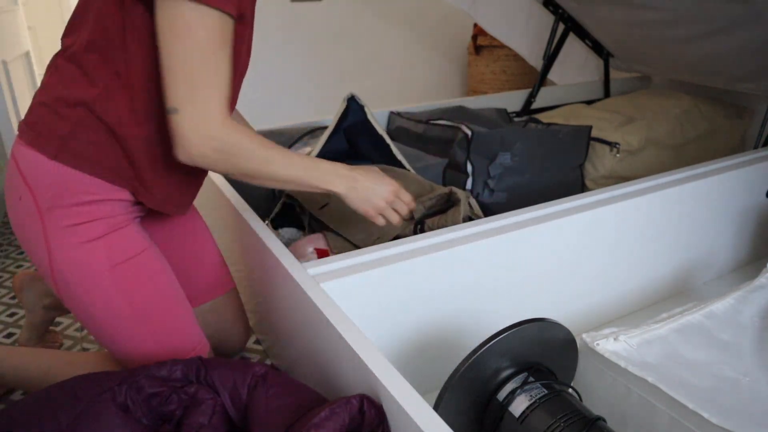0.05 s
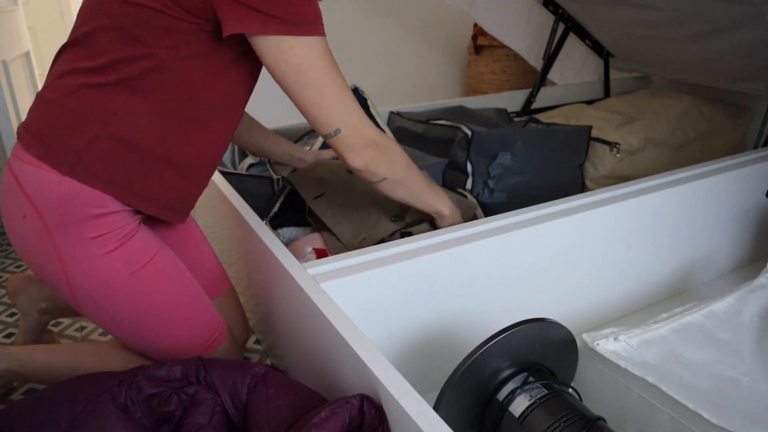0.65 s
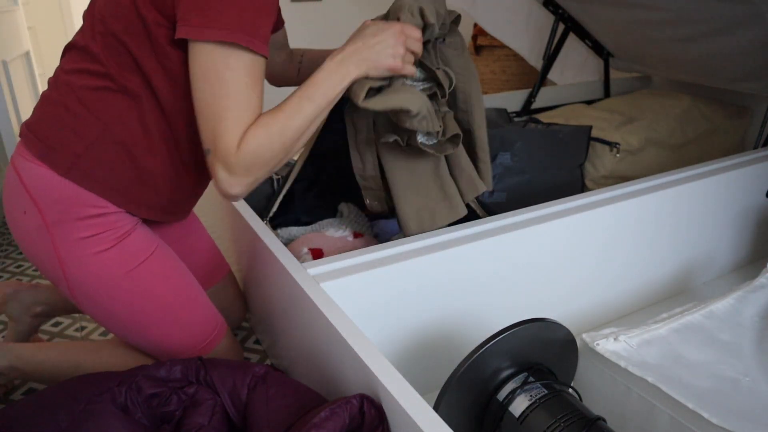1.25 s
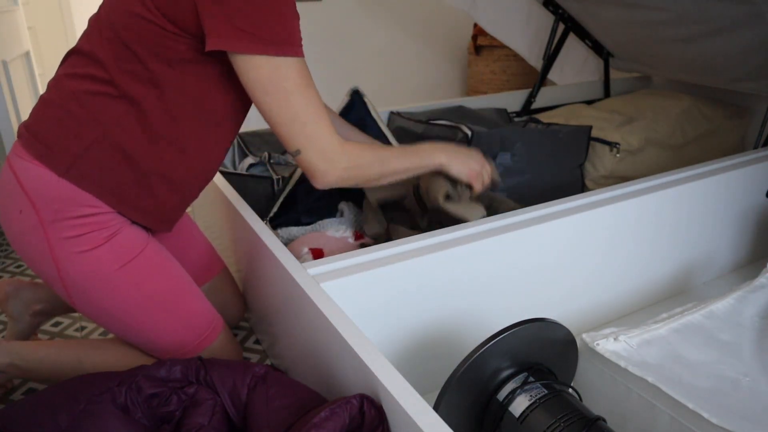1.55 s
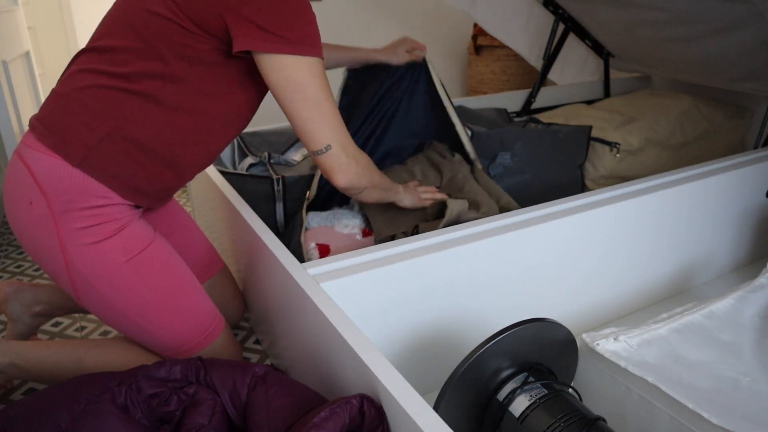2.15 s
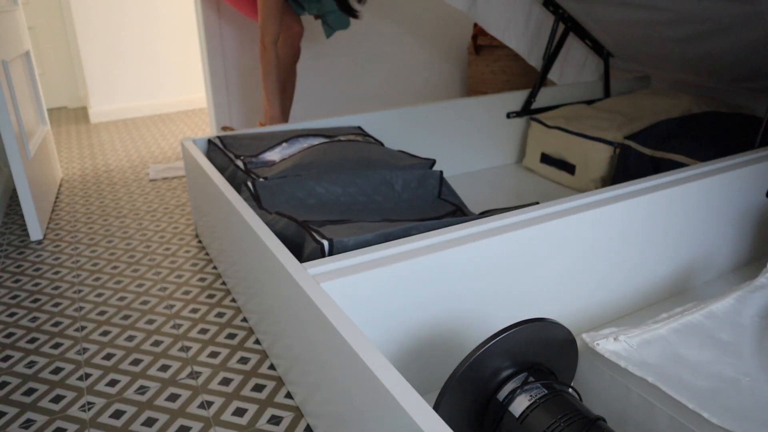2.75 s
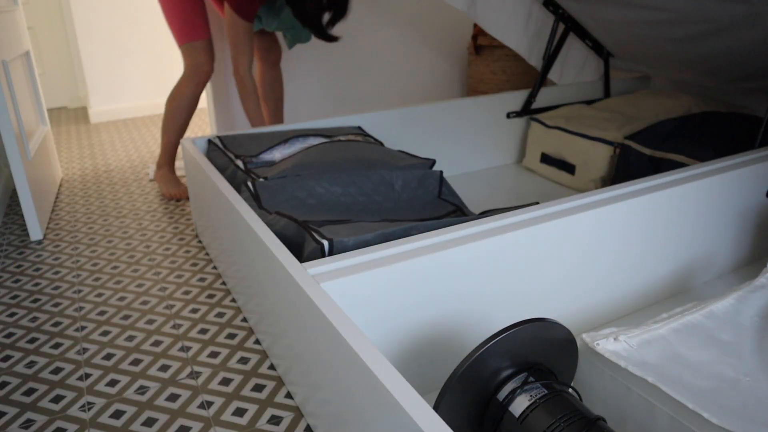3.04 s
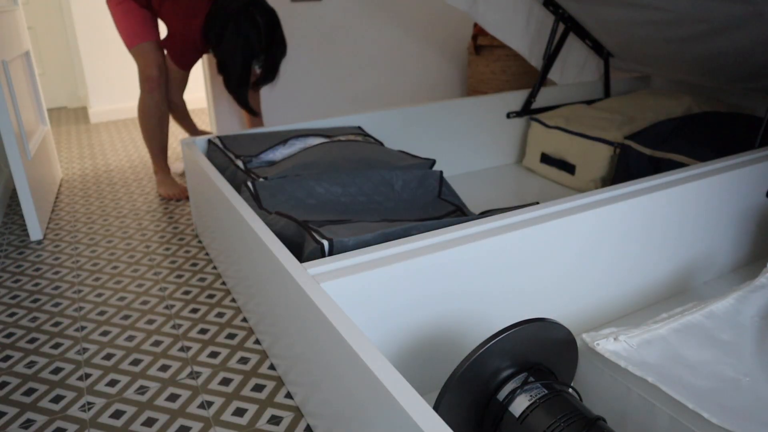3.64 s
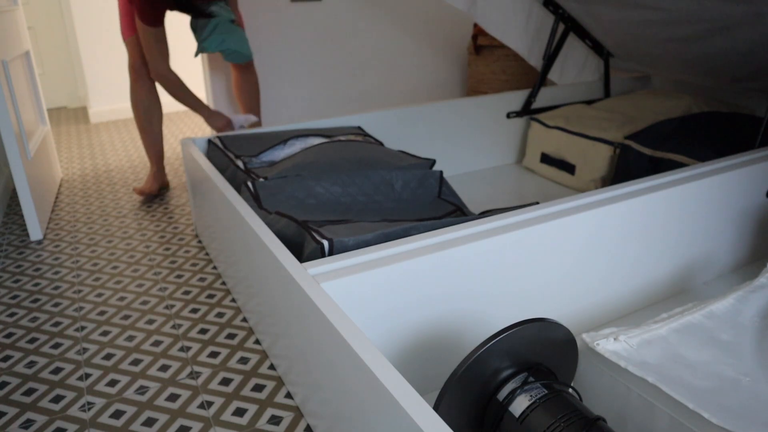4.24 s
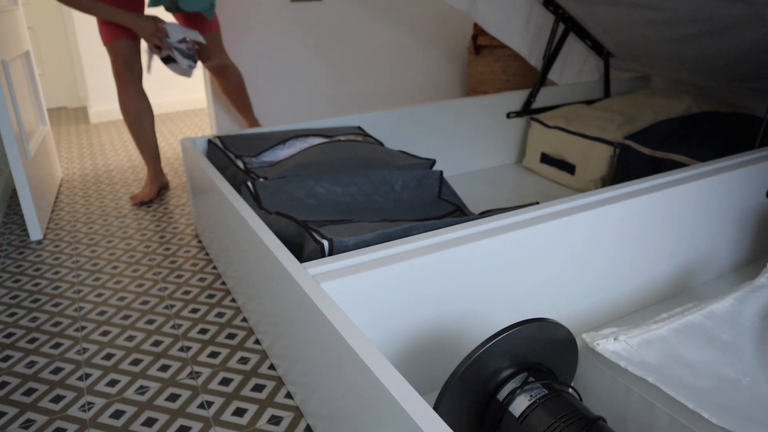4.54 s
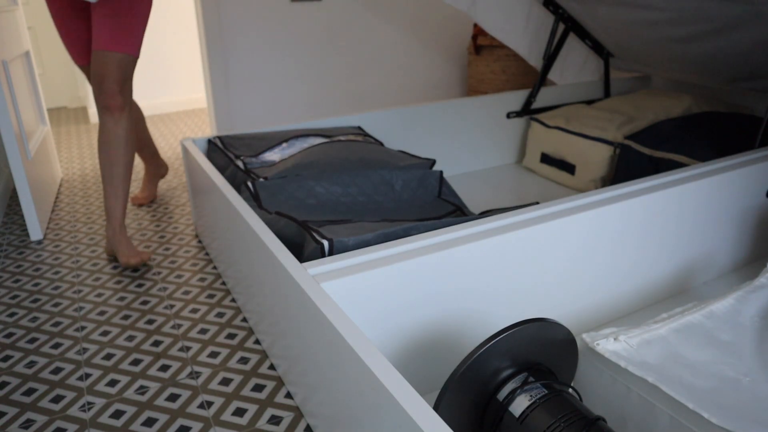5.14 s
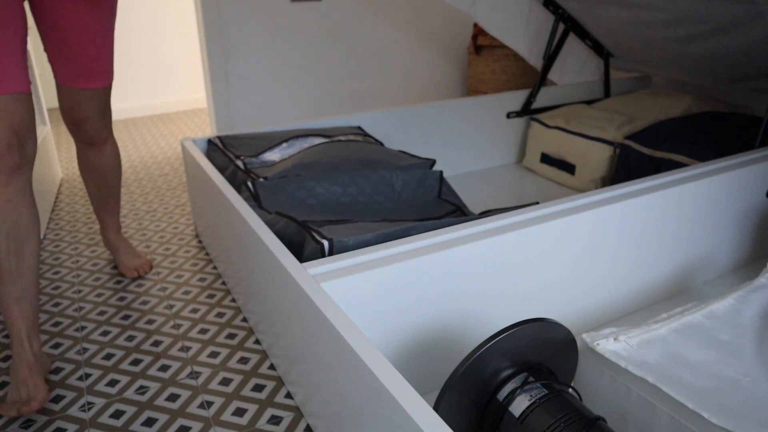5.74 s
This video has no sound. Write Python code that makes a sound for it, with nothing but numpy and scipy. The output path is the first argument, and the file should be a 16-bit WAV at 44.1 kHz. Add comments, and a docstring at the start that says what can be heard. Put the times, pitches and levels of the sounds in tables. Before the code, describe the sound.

In a quiet, slightly echoing bedroom, someone stuffs clothes into a zipped bag near a stereo microphone: soft rustles, then a louder flurry with buttons and fittings ticking and clacking on wood. From farther away come two spells of boxy scraping and hollow knocks as fabric is pushed along a wooden storage base. Bare feet then thud dully on the tiles with a faint brushing.

```python
"""Packing clothes into a bed base

Close by, clothes are pushed into a zipped fabric bag in a bed's wooden storage base: cloth rubs and
crinkles, buttons and zip pulls tick. Then, from across the tiled bedroom, things are shoved and wiped
along the far side of the base, which knocks and rings. Bare feet thud on the floor.
A small stereo microphone spreads the treble very wide."""
import sys
import numpy as np
from scipy import signal
from scipy.fft import rfft, irfft, next_fast_len
from scipy.io import wavfile

SR = 44100
rng = np.random.default_rng(int(sys.argv[2]) if len(sys.argv) > 2 else 0)


def pcm_store(signal):
    """Save signal as 16-bit PCM."""
    levels = np.round(np.clip(np.atleast_2d(signal), -1, 1) * 32767)
    wavfile.write(sys.argv[1], SR, levels.astype(np.int16).T)


N = 259744
T = np.arange(N) / SR
CUTOFF_HZ = 12700


def amp(db):
    """Decibels to gain."""
    return 10 ** (np.asarray(db) / 20)


def rms_one(x):
    """Scale to an rms of 1."""
    return x / np.sqrt(np.mean(x ** 2) + 1e-20)


def dying(t, t60):
    """Exponential decay, 60 dB down after t60 seconds."""
    return np.exp(-np.log(1000) * t / max(t60, 1e-3))


def colour(x, spectrum):
    """EQ by a curve of (frequency [Hz], gain [dB]) points."""
    hz, db = np.transpose(spectrum)
    size = next_fast_len(x.shape[-1] + 4096)
    bins = np.maximum(np.fft.rfftfreq(size, 1 / SR), 1)
    gain = amp(np.interp(np.log(bins), np.log(hz), db))
    return irfft(rfft(x, size) * gain, size)[..., :x.shape[-1]]


def resonate(x, hz, width_hz):
    """One resonance, unity gain at its peak."""
    r = np.exp(-np.pi * width_hz / SR)
    feedback = [1, -2 * r * np.cos(2 * np.pi * hz / SR), r * r]
    return signal.lfilter(np.array([1, 0, -1]) * (1 - r * r) / 2, feedback, x)


def drift(per_s):
    """A random wander with an rms of 1."""
    knots = rng.standard_normal(2048)
    return rms_one(np.interp(T * per_s, np.arange(len(knots)), knots))


def add(out, s, sound):
    """Mix a sound in at s seconds."""
    start = max(round(s * SR), 0)
    out[..., start:start + sound.shape[-1]] += sound[..., :N - start]


def bedroom(x, wet_db, t60=0.48):
    """Dense reflections off tiles and walls follow the direct sound; the treble dies first."""
    t = T[:SR // 2]
    echoes = rng.standard_normal((2, len(t))) * np.clip(t / 0.0013 - .3, 0, 1)
    dull = signal.sosfilt(signal.butter(2, 4500, fs=SR, output="sos"), echoes)
    bright_early = 1.53 * np.roll(echoes, 1, axis=0) * dying(t, 0.053)
    tail = dull * dying(t, t60) + bright_early
    tail /= np.sqrt(np.sum((echoes * dying(t, t60)) ** 2) / 2)
    wet = signal.fftconvolve(x, tail, axes=1)[:, :N]
    return (x + amp(wet_db) * wet) / np.hypot(1, amp(wet_db))


def spread(pair, width, lead):
    """Mid/side to left/right; sound from the left arrives there first, a quarter turn ahead in the side."""
    mid, side = pair
    ahead = -signal.hilbert(mid, next_fast_len(N)).imag[:N]
    side = colour(lead * ahead + np.sqrt(1 - lead ** 2) * side, width)
    return np.array([mid + side, mid - side])


def crinkles(per_s, spread_db, pitches=12):
    """Tiny folds buckle at random, each ringing a cycle or two at its own pitch; rows are mid and side."""
    sizes = amp(spread_db * np.minimum(rng.exponential(1, N), 4))
    buckles = sizes * (rng.random(N) < per_s / SR)
    pitch_index, out = rng.integers(0, pitches, N), 0
    for k, hz in enumerate(np.geomspace(500, 11000, pitches)):
        clicks = buckles * (pitch_index == k) * rng.choice([-1, 1], (2, N))
        out = out + resonate(clicks + 1e-18, hz, 0.54 * hz)
    return rms_one(out)


def stroke(s, swell_s, fade_s):
    """Cloth speeds up from rest, its sound growing as speed squared, then loses 31 dB per fade time."""
    speed = np.clip(1 + (T - s) / max(swell_s, .005), 0, 1)
    return speed ** 2 * amp(-31 * np.clip((T - s) / fade_s, 0, 10))


def rustle(strokes, weave, flutter_db):
    """Each stroke drives bulk, weave and fibres; the cloth catches and slips, so all three flutter."""
    # bands of shifting bulk, weave on weave and single fibres: (low edge [Hz], high edge [Hz])
    cloth_bands = [(65, 900), (900, 5000), (5000, 15000)]
    power = sum((amp([[db + bulk_db], [db], [db + fibre_db]]) * stroke(s, swell_s, fade_s)) ** 2
                for s, db, swell_s, fade_s, bulk_db, fibre_db in strokes)
    shared_slip, out = drift(per_s=110), 0
    for edges, push in zip(cloth_bands, np.sqrt(power)):
        band = rms_one(signal.sosfilt(signal.butter(4, edges, "band", fs=SR, output="sos"), weave))
        flutter = rms_one(amp(flutter_db * (shared_slip + 2.7 * drift(per_s=60))))
        out = out + band * push * flutter
    return out


def packing():
    """Hands push clothes into the bag, close up: friction hiss full of crinkles."""
    # hand strokes: (peak time [s], rub [dB], swell [s], fade [s], bulk re rub [dB], fibres re rub [dB])
    hand_strokes = [(0.04, -36, 0.68, 0.16, -3, -9), (0.17, -48.5, 0.027, 0.41, -3, -5.5),
                    (0.39, -47.5, 0.18, 0.42, 3.5, -3.5), (0.87, -56, 1.3, 0.68, 4.5, -9),
                    (1.01, -60.5, 0.23, 0.31, 13, 8), (1.33, -55.5, 0.13, 0.059, 9.5, -10),
                    (1.478, -52.5, 0.044, 0.1, 16, -22), (1.505, -58, 0.035, 0.25, 19.5, -1.5),
                    (1.605, -44.5, 0.048, 0.15, 7.5, -6.5), (1.67, -36.5, 0.067, 0.16, -1.5, -9),
                    (1.71, -42, 0.04, 0.1, 9, -22), (1.785, -36, 0.075, 0.23, -11, -1.5),
                    (1.855, -39, 0.072, 0.045, 6, -2.5), (1.982, -43.5, 0.022, 0.12, 12.5, -8),
                    (2.045, -32, 0.059, 0.061, 4.5, -8), (2.1, -29.5, 0.079, 0.24, -14, 1),
                    (2.14, -24.5, 0.087, 0.26, 0, -2.5), (2.21, -27.5, 0.17, 0.34, 4, -15),
                    (2.335, -41.5, 0.074, 0.17, 0, -2), (2.46, -41, 0.2, 0.19, 2.5, -3),
                    (2.6, -51.5, 0.19, 0.2, 5, -1)]
    # tone of close cloth: (frequency [Hz], gain [dB])
    cloth_tone = [(35, -22), (60, 4), (100, 4), (151, 7), (251, -1.5), (317, -7), (399, 2), (480, -2.5),
                  (560, -1.5), (680, -5.5), (830, -6.5), (1200, -8.5), (1710, -6.5), (1960, -8), (2150, -8),
                  (8820, -20), (11400, -17), (15000, -29)]
    folds = crinkles(per_s=900, spread_db=2.5)
    weave = colour(rng.standard_normal((2, N)) + amp(-9.5) * folds, cloth_tone)
    return bedroom(rustle(hand_strokes, weave, flutter_db=1.0), wet_db=-7.5)


def air_and_brushing():
    """Steady room air and, late on, the faint, slightly singing brush of soles and clothes."""
    # tone of both air and brushing: (frequency [Hz], gain [dB])
    hush_tone = [(15, -39), (25, 3), (54, 1.5), (150, -5.5), (278, -3), (309, -5.5), (604, -7.5),
                 (811, -10), (879, -11), (2020, -13.5), (2370, -15), (11800, -29.5), (15000, -24.5)]
    # brushes while walking: (peak time [s], rub [dB], swell [s], fade [s])
    brushes = [(4.6, -56, 0.59, 1.5), (4.85, -54.5, 0.93, 3), (5.18, -49, 0.24, 1.5),
               (5.528, -54, 0.24, 0.26), (5.76, -55.5, 0.09, 0.14), (5.88, -53.5, 0.067, 0.18)]
    bulk_db, fibre_db, sole_hz = 0.5, -6.5, 2030
    air = amp(-54) * rms_one(colour(rng.standard_normal((2, N)), hush_tone))
    friction = colour(rng.standard_normal((2, N)), hush_tone)
    singing_sole = amp(1.5) * resonate(friction, sole_hz, width_hz=120)
    strides = [(*row, bulk_db, fibre_db) for row in brushes]
    return air + amp(-4.5) * rustle(strides, friction + singing_sole, flutter_db=0.72)


def snaps(contacts, width, ring_db, rise_share):
    """Each contact swells for a share of its t60 and dies: pitched crackle, faint ring, bright edge."""
    out, t = np.zeros((2, N)), T[:SR // 3]
    for s, db, hz, t60, treble_db in contacts:
        hz = min(hz, CUTOFF_HZ)
        grit = rng.standard_normal((2, len(t)))
        ring = amp(ring_db) * np.sin(2 * np.pi * hz * t * [[1], [.9]])
        body = rms_one(resonate(resonate(grit, hz, width * hz), hz, width * hz))
        edge = amp(treble_db) * rms_one(resonate(grit, 4400, width_hz=10300))
        envelope = (1 - np.exp(-t / (rise_share * t60))) * dying(t, t60)
        add(out, s, amp(db) / 2 * (body + ring + edge) * envelope / envelope.max())
    return out


def cracks(contacts, cycles=6.2, edge_hz=6400):
    """The instant a button hits or a fold snaps over: a few hard cycles under a sharp edge."""
    out, t = np.zeros((2, N)), T[:SR // 20]
    for s, db, hz, _, treble_db in contacts:
        pop = np.sin(2 * np.pi * hz * t) * dying(t, cycles / hz)
        edge = amp(treble_db) * np.sin(2 * np.pi * edge_hz * t) * dying(t, 0.00077)
        mid_side = np.array([[1], [rng.choice([-.8, .8])]])
        add(out, s, amp(db) * (pop + edge) * mid_side)
    return out


def ticks():
    """Buttons, zip pulls and snapping folds tick close by; a few fittings clack on the wood."""
    # small contacts: (time [s], level [dB], pitch [Hz], t60 [s], treble [dB])
    contacts = [(0.009, -25.5, 4430, 0.018, 13), (0.1895, -22.5, 4700, 0.017, -14),
                (0.3333, -22.5, 4900, 0.0028, 1), (0.3357, -20.5, 4860, 0.0023, 6),
                (0.359, -28, 3500, 0.012, -1), (0.4515, -33, 3200, 0.024, -2),
                (1.3035, -32.5, 1680, 0.017, -16), (1.461, -35, 1500, 0.073, -17),
                (1.5096, -35, 11100, 0.018, -14), (1.605, -30, 950, 0.022, -18),
                (1.6637, -28, 1890, 0.034, -15), (1.844, -31, 1310, 0.036, -16),
                (1.973, -35, 980, 0.038, -20), (2.0398, -11, 2380, 0.011, -13),
                (2.046, -10.5, 2840, 0.015, -15), (2.0663, -15, 2220, 0.026, -15),
                (2.1125, -8.5, 1280, 0.025, -18), (2.1275, -4, 1630, 0.024, -7),
                (2.1302, -7, 2800, 0.013, -5), (2.138, -20, 2000, 0.012, -8), (2.1615, -13, 1510, 0.019, 2),
                (2.1812, -1, 1500, 0.021, -7), (2.2008, -6.5, 2560, 0.02, -19),
                (2.2045, -9.5, 3350, 0.024, -2), (2.258, -10.5, 1570, 0.028, -17),
                (2.2928, -11, 2250, 0.012, -12), (2.3238, -5, 1810, 0.0062, -14),
                (2.341, -24, 2000, 0.018, -14), (2.3988, -16, 2900, 0.014, -3),
                (2.408, -36.5, 7800, 0.023, 15), (2.43, -40, 2950, 0.015, 5),
                (2.4758, -22, 2900, 0.02, -17), (5.074, -50, 9200, 0.025, 2.5)]
    crackle = amp(-3) * snaps(contacts, width=0.86, ring_db=-29, rise_share=0.0058)
    attacks = amp(-1.5) * cracks(contacts)
    return bedroom(crackle + attacks + amp(1) * clacks(), wet_db=-5.5)


def struck(blows, modes, contact_s, place_db=5, place_octaves=0.25):
    """A blow rings every mode; soft contact dulls the high ones, a resting hand shortens the ring."""
    out, t = np.zeros((2, N)), T[:2 * SR]
    swell = 1 - np.exp(-t / contact_s)
    for k, (hz, mode_db, t60) in enumerate(modes):
        wave = (-1) ** k * swell * np.sin(2 * np.pi * (hz * t + [[0], [rng.random()]]))
        for s, db, cut_hz, ring_share, place_hz in blows:
            # the spot struck favours the modes near place_hz
            lift_db = place_db * np.exp(-(np.log2(hz / place_hz) / place_octaves) ** 2)
            gain = amp(db + mode_db + lift_db + rng.standard_normal()) / np.hypot(1, (hz / cut_hz) ** 2)
            add(out, s, wave * dying(t, t60 * ring_share) * gain)
    return out


def knocks(waver_db=0.5):
    """The wooden base is bumped and rings, wavering slightly."""
    # blows: (time [s], level [dB], contact cut-off [Hz], ring left by the hand [share], favoured [Hz])
    blows = [(0.01, -39, 1200, 0.42, 228), (0.334, -46, 2000, 0.45, 450), (1.853, -41, 723, 0.6, 180),
             (2.181, -26, 1500, 0.4, 640), (2.652, -26, 600, 0.66, 382), (2.714, -33, 500, 0.6, 382),
             (2.874, -18, 1200, 0.81, 242), (2.933, -24.5, 460, 0.36, 280), (3.234, -35, 490, 1, 280),
             (4.09, -41, 510, 0.4, 290), (4.303, -31, 400, 0.46, 280), (4.346, -36, 500, 0.41, 280)]
    # modes of the base: (frequency [Hz], level [dB], t60 [s])
    base_modes = [(152, -7, 0.32), (179, -6, 0.2), (263, -13, 1.03), (279, -2.5, 0.45), (382, -5, 0.24),
                  (284.1, -16.5, 2.1), (520, -5, 0.43), (550, -14, 1.2), (640, 0, 0.24), (683, 3, 0.17),
                  (850, -19, 0.11)]
    ring = struck(blows, base_modes, contact_s=0.0091)
    return bedroom(ring * amp(waver_db * drift(per_s=25)), wet_db=-11)


def clacks(rise_s=0.00044, side_db=-3.5):
    """A buckle or button strikes wood: a few close modes ring for some milliseconds."""
    # hard fittings on wood: (time [s], level [dB], pitch [Hz], t60 [s])
    hits = [(0.3335, -15, 1820, 0.011), (0.359, -28, 1650, 0.014), (2.1818, -1.5, 1377, 0.015),
            (2.189, -6.5, 640, 0.027)]
    # their modes: (frequency [x pitch], level [dB], decay [x t60])
    modes = [(0.57, -8.5, 1.3), (0.88, -10.5, 1.4), (1, 0, 0.8), (1.14, -15, 1.3), (1.53, -20, 1.2),
             (2.6, -20, 0.9)]
    out, t = np.zeros((2, N)), T[:SR // 10]
    swell = 1 - np.exp(-t / rise_s)
    for s, db, hz, t60 in hits:
        ring = sum(amp(mode_db) * np.sin(2 * np.pi * ratio * hz * t) * dying(t, t60 * length)
                   for ratio, mode_db, length in modes)
        add(out, s, amp(db) * swell * ring * amp([[0], [side_db]]))
    return out


def floor_thuds():
    """Knees, bare feet and set-down bags thud on the floor, leaving an uneven rumble in the room."""
    # impacts: (time [s], level [dB], contact cut-off [Hz], favoured frequency [Hz])
    impacts = [(0.545, -47.5, 110, 58), (1.256, -51, 70, 58), (2.212, -39, 150, 148),
               (3.102, -40.5, 240, 148), (4.125, -47, 100, 80), (4.205, -47, 100, 80),
               (4.271, -54, 100, 80), (5.233, -31, 134, 80), (5.28, -38, 120, 80), (5.83, -42, 128, 80),
               (5.865, -42, 109, 80)]
    # modes of floor and room: (frequency [Hz], level [dB], t60 [s])
    floor_modes = [(59.3, 8.5, 0.29), (81.2, -1.5, 0.23), (125, -1, 0.28), (148.5, 2.5, 0.17)]
    undamped = [(s, db, cut_hz, 1, place_hz) for s, db, cut_hz, place_hz in impacts]
    thuds = struck(undamped, floor_modes, contact_s=0.0045)
    t = T[:2 * SR]
    tail = rng.standard_normal((2, len(t))) * dying(t, t60=1.75) * np.clip(t / 0.025, 0, 1)
    tail /= np.sqrt(np.sum(tail ** 2) / 2)
    rumble = signal.fftconvolve(thuds, tail, axes=1)[:, :N]
    return thuds + amp(-8.5) * rumble


def hollow_base(x):
    """Whatever rubs on the base sets its hollow ringing."""
    # resonances of the hollow: (frequency [Hz], width [Hz], gain [dB])
    resonances = [(148, 41, 7), (276, 23, 1.5), (385, 8.3, 6), (516, 60, 5.5), (571, 30, 0), (776, 47, -7),
                  (1136, 16, -7), (1210, 14, 4), (1356, 30, 0.5), (1536, 45, 1.5), (1674, 69, -2),
                  (1793, 46, 2.5), (1900, 22, -1.5), (2620, 37, -3), (2800, 45, 0.5), (3450, 78, -5),
                  (3800, 77, -3.5), (5260, 40, -6), (6180, 75, 0.5)]
    return x + sum(amp(db) * resonate(x, hz, width_hz) for hz, width_hz, db in resonances)


def shoving():
    """Cloth is shoved and wiped along the far side of the base: a boxy, crackly rasp, wet with room."""
    # shoves: (peak time [s], rub [dB], swell [s], fade [s], bulk re rub [dB], fibres re rub [dB])
    shoves = [(2.658, -15.5, 0.023, 0.091, -2.5, -10.5), (2.695, -19.5, 0.04, 0.26, -6, 0),
              (2.785, -21, 0.038, 0.17, -19, -1.5), (2.86, -22.5, 0.042, 0.17, -7, -7),
              (2.89, -20, 0.042, 0.35, -3, -7.5), (3.15, -23, 0.097, 0.27, -17, -10),
              (3.34, -34.5, 0.19, 0.17, -5, -30), (3.56, -64, 0.31, 0.085, 9, 6.5),
              (4.052, -30, 0.1, 0.084, -9, -8), (4.095, -18, 0.1, 0.076, -13, -6.5),
              (4.17, -30.5, 0.085, 0.12, -15, -30), (4.225, -27.5, 0.11, 0.11, -16, -11),
              (4.315, -33, 0.079, 0.11, 1, -18)]
    # tone of distant cloth: (frequency [Hz], gain [dB])
    cloth_tone = [(35, -26), (60, 2), (151, -0.5), (214, 1.5), (276, 3), (324, 5), (381, -1.5), (633, -2.5),
                  (727, 0), (938, -5.5), (2840, -2), (8040, -26.5), (8820, -28.5), (11600, -31),
                  (15000, -78)]
    # stiff fabric scuffing the base: (time [s], level [dB], pitch [Hz], t60 [s], treble [dB])
    contacts = [(2.647, -17, 2830, 0.04, -9), (2.682, -25, 5000, 0.11, -28),
                (2.7515, -6, 3230, 0.066, -6.5), (2.936, -25.5, 7660, 0.18, -19),
                (3.112, -23.5, 4440, 0.18, -10), (3.13, -34, 1750, 0.089, -28),
                (3.31, -31.5, 2490, 0.22, -7), (3.465, -60.5, 9900, 0.26, -12.5),
                (3.982, -35, 1900, 0.14, -16), (4.019, -26, 2980, 0.034, -10), (4.07, -22, 1310, 0.35, -30),
                (4.488, -50.5, 9500, 0.15, 0)]
    friction = rng.standard_normal((2, N)) + amp(-7) * crinkles(per_s=600, spread_db=1.0)
    rasp = amp(-4) * hollow_base(rustle(shoves, colour(friction, cloth_tone), flutter_db=0.9))
    scuffs = amp(1) * hollow_base(snaps(contacts, width=1.0, ring_db=-40, rise_share=.018))
    return bedroom(rasp, wet_db=-4.5) + bedroom(scuffs, wet_db=-2)


def scene():
    """Near packing and thuds, far shoving and knocks, in one quiet room."""
    # stereo width of the near, far and background layers: (frequency [Hz], side gain [dB])
    near_width = [(60, -69), (110, -57), (200, -21), (380, -12.5), (690, -7.5), (1280, -1), (2350, 1.5),
                  (4330, 2.5), (14700, 7.5)]
    far_width = [(60, -24), (110, -57), (200, -22), (380, -11), (690, -9), (1280, -0.5), (2350, 2),
                 (4330, 5), (8000, 8)]
    hush_width = [(60, -40), (110, -8), (200, -2.5), (380, 1.5), (690, 2.5), (2350, 4), (8000, 8.5)]
    wood = knocks()
    near = spread(packing() + ticks() + floor_thuds(), near_width, lead=0.18)
    far = spread(shoving() + wood, far_width, lead=0.5)
    hush = spread(air_and_brushing(), hush_width, lead=0.12)
    return (near + far + hush) * amp([[.2], [-.2]])


def record(dry):
    """A soft clip rounds the highest peaks; a steep low-pass cuts the top."""
    rounded = dry / (1 + (dry / .85) ** 4) ** .25
    return signal.sosfilt(signal.butter(20, CUTOFF_HZ, fs=SR, output="sos"), rounded)


dry = scene()
out = record(dry)
pcm_store(out)
```